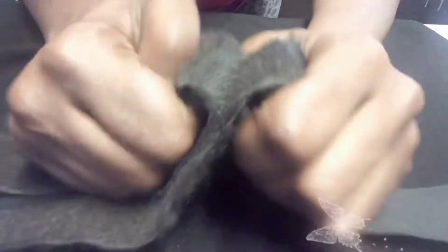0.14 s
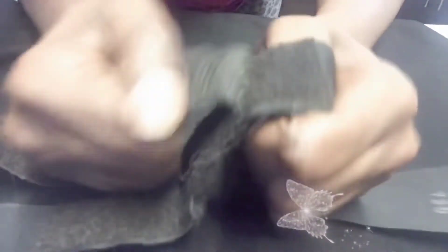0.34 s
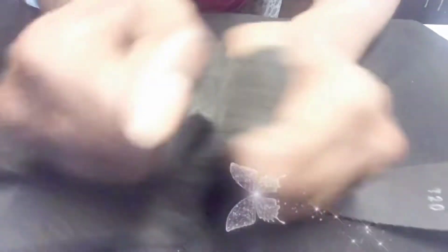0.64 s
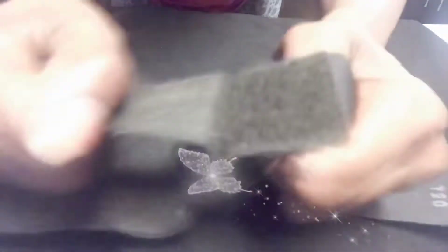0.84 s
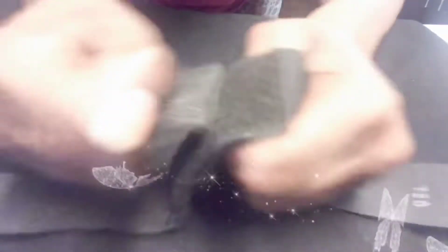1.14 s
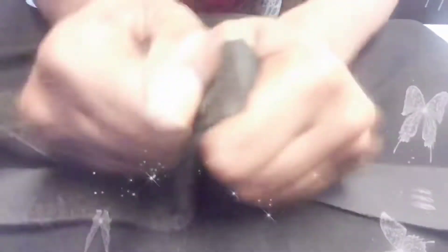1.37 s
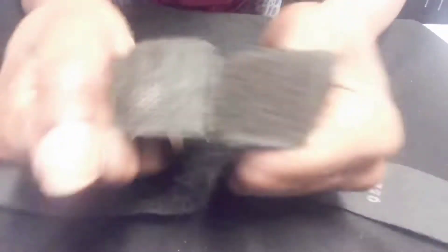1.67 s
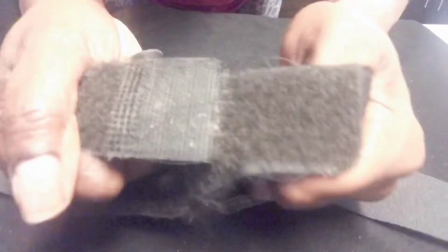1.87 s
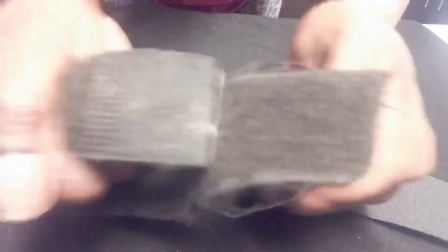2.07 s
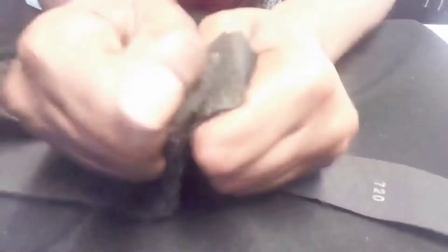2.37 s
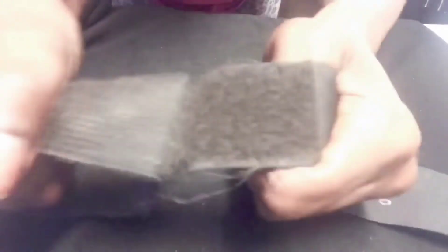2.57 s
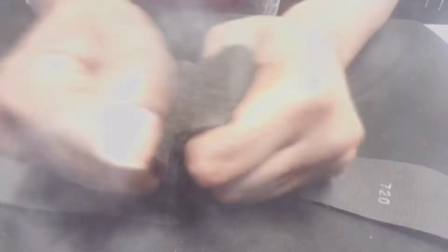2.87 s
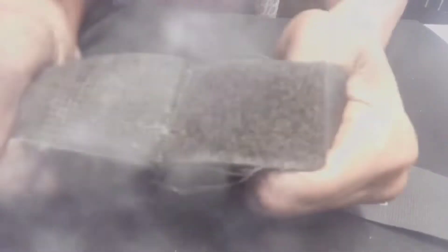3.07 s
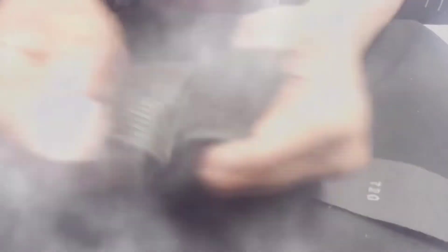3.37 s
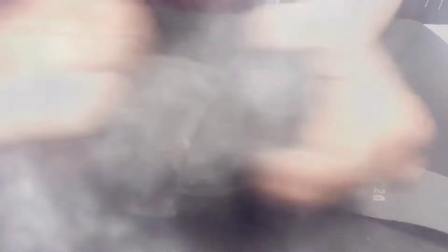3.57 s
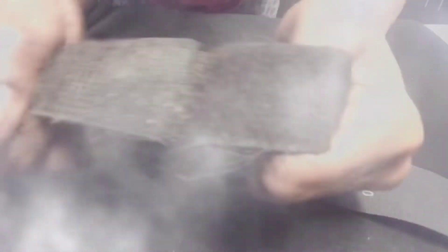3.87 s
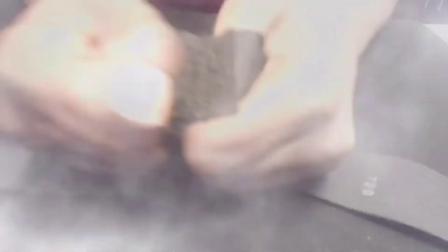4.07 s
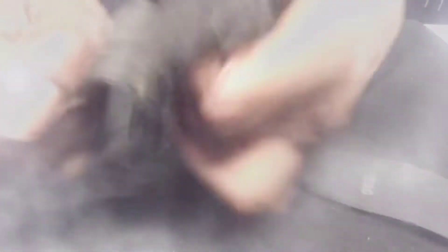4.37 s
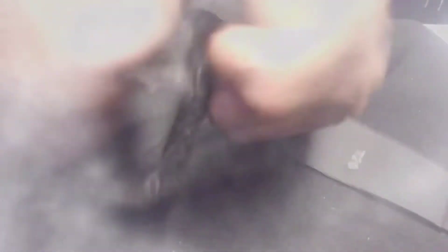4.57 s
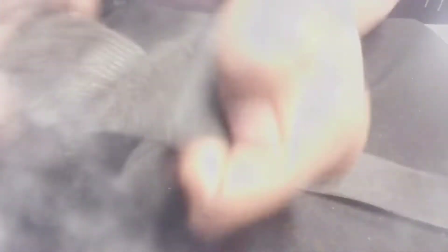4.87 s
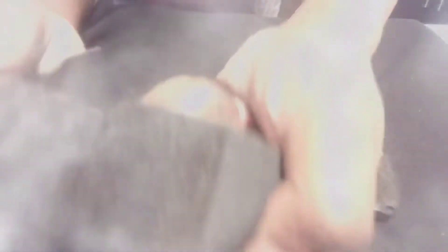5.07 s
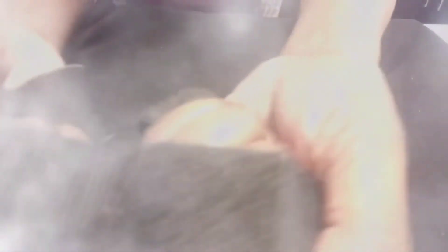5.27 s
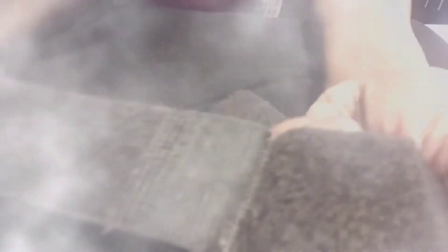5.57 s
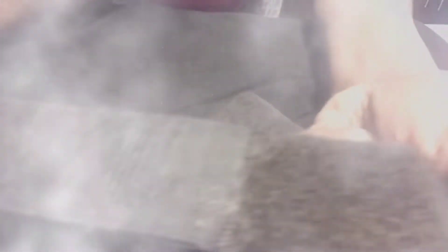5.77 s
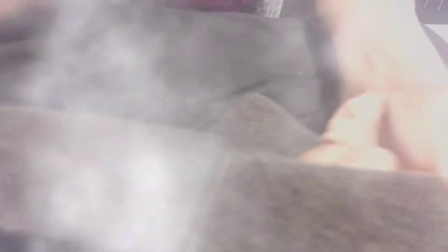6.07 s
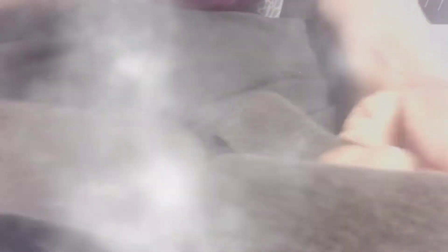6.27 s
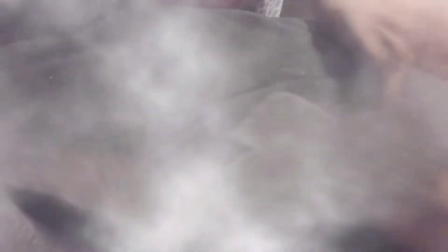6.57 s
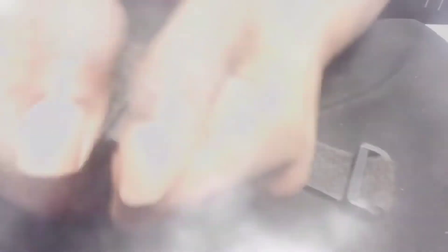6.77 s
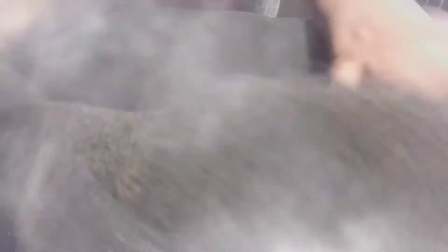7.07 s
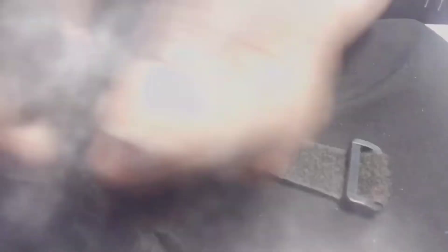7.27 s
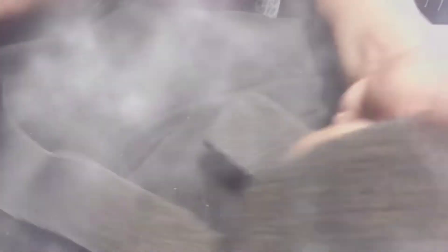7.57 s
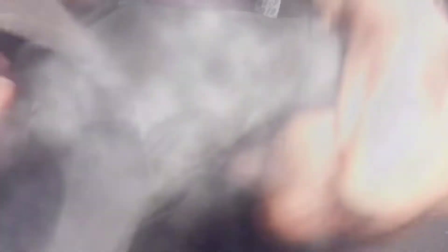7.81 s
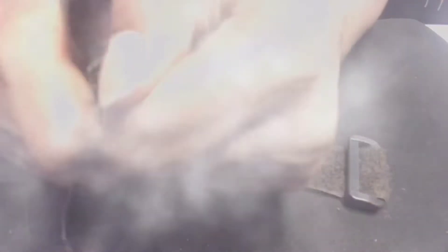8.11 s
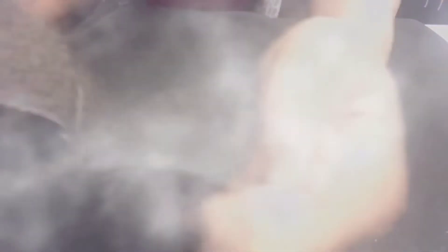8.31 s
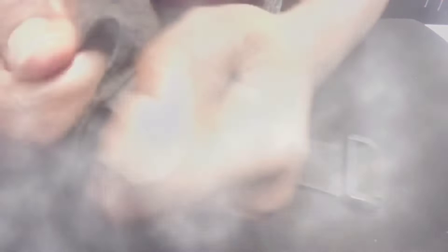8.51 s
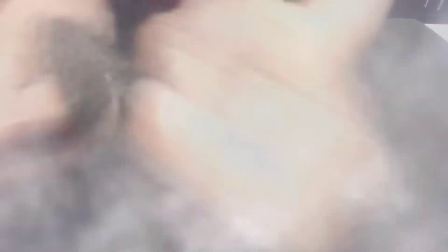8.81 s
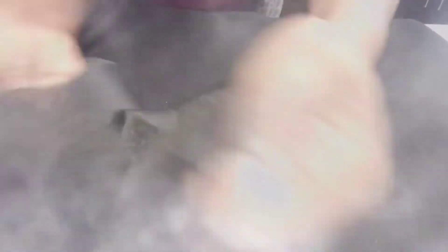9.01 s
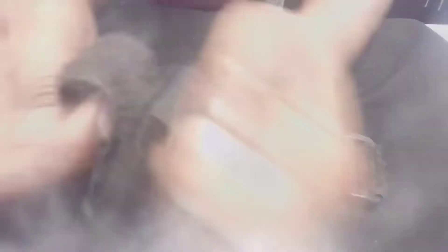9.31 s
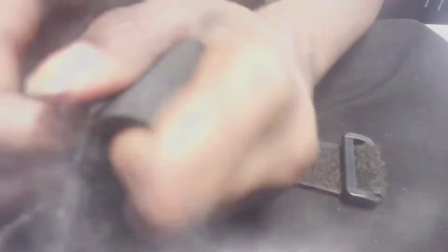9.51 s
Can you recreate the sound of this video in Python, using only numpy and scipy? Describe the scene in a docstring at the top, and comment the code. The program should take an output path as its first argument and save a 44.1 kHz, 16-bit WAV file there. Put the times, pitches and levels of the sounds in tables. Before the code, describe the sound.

Hook-and-loop straps torn apart by hand in quick, bright scratchy rips close to the microphone, then weaker crackly fumbling and soft knocks over low machine hum.

```python
"""Hook-and-loop straps torn by hand, close

Two hands close to the microphone tear straps apart again and again, then fumble with them.
Each hook that lets go is a tiny click ringing in the stiff tape; fast pulls blur thousands into a rip.
Single hooks snap out as dry spikes with a short ring and a puff of fibre noise.
A small room answers, a machine hums and rumbles over room tone, the hands knock the table now and then."""
import sys
import numpy as np
from scipy import signal
from scipy.fft import rfft, irfft
from scipy.io import wavfile
from scipy.ndimage import uniform_filter1d

SR = 44100
rng = np.random.default_rng(int(sys.argv[2]) if len(sys.argv) > 2 else 0)


def pcm_store(signal):
    """Save signal as 16-bit PCM."""
    levels = np.round(np.clip(np.atleast_2d(signal), -1, 1) * 32767)
    wavfile.write(sys.argv[1], SR, levels.astype(np.int16).T)


N = 425565

# low tones of the machine: pitch_hz, level_db (rms), waver_db
HUM_TONES = [(18.8, -38.5, -0.5), (58.8, -43, 3), (120.5, -44.5, 3), (197.2, -43.5, 0), (239.8, -46, 3)]
# spectrum of the room tone: pitch_hz, density_db (per Hz, relative)
ROOM_TONE = [(18, -24), (30, -0.5), (157, -8), (210, -5), (252, -12), (287, -15), (345, -12), (460, -17),
             (560, -23.5), (1630, -31.5), (2980, -32), (8520, -37), (14400, -51), (16000, -50)]
# knocks of the hands on the table: start_s, strength_db
TABLE_KNOCKS = [(2.237, -28), (4.977, -20.5), (5.545, -23), (5.677, -23.5), (6.988, -16), (7.189, -23),
                (7.369, -19.5), (8.451, -23.5), (8.827, -23)]
# resonances of the table: pitch_hz, level_db, t60_s
TABLE_MODES = [(34.6, -4, 0.38), (110, -5.5, 0.17), (234.2, 1, 0.2)]
# single hooks or rows of hooks heard on their own: start_s, level_db (peak of the ring), pitch_hz
HOOK_SNAPS = [(0.2105, -15.5, 6760), (0.247, -15, 4860), (0.254, -18, 4500), (0.264, -18, 3900),
              (0.2705, -17, 4000), (0.2805, -19, 3900), (0.3, -18, 3500), (0.324, -16, 3800),
              (0.34, -6, 5940), (0.485, -14, 2950), (0.769, -24, 2190), (0.7746, -25, 5660),
              (0.7825, -17, 6580), (0.9943, -17, 2850), (1.0106, -9, 8100), (1.1287, -10, 3490),
              (1.1358, -13, 3260), (1.5213, -11, 2560), (1.6626, -5, 3730), (1.8436, -13, 3750),
              (1.856, -11, 3600), (2.006, -2, 7450), (2.0126, -1.5, 4230), (2.0656, 2, 3700),
              (2.392, -22, 1500), (2.47, -12, 6540), (2.4813, -2, 6300), (2.7596, -17, 3760),
              (2.9157, -11.5, 4440), (2.9234, -12, 6200), (2.94, 0, 6600), (3.2571, -8, 3350),
              (3.3294, -11, 4430), (3.336, -18, 3200), (3.3392, -9, 6300), (3.3584, -16, 6500),
              (3.676, -19, 3760), (3.6982, -15, 3760), (3.7167, -3, 6810), (4.0874, -11, 6090),
              (4.117, 2, 5900), (4.5956, -20.5, 7160), (4.86, -27, 2270), (4.877, -17.5, 2240),
              (4.9076, -12, 2100), (4.934, -19, 5170), (5.0839, -7, 5600), (5.1205, -6, 4670),
              (5.1339, -1, 8400), (5.1526, -9, 3450), (5.1766, -8, 3000), (5.196, -4, 5950),
              (5.2043, -2, 6000), (5.2493, -3, 8140), (5.2567, -12, 2760), (5.262, 0, 8200),
              (5.6497, -10, 3030), (5.672, 0, 5740), (5.8334, -10, 6100), (5.8395, -2.5, 5540),
              (5.9263, -12, 2930), (5.933, -6, 5640), (5.9414, -5, 5670), (5.953, 5, 2830),
              (6.2387, -12, 6540), (6.9316, -10, 6600), (6.9384, -20, 2840), (7.1318, -19, 3460),
              (7.1726, -18, 3000), (7.3053, -15, 5450), (7.5139, -28, 4000), (7.9052, -15, 6310),
              (7.9072, -20, 3530), (7.947, -17.5, 1910), (8.08, -25, 4160), (8.0918, -28, 3480),
              (8.227, -21, 2900), (8.3209, -19.5, 4600), (8.4614, -19, 1900), (8.4776, -9, 6300),
              (8.4796, -8, 4300), (8.55, -17, 3790), (8.6296, -2.5, 4960), (8.646, -13, 5300),
              (8.6494, -7, 4470), (8.656, -6, 4740), (8.6592, 0.5, 6300), (8.6624, -12, 3700),
              (8.6685, -6, 4230), (9.0405, -15, 3900), (9.0536, -3, 7350), (9.0576, -8, 4480),
              (9.0611, -4.5, 6600), (9.0633, -3, 4750), (9.0705, -14, 5170), (9.4454, -28, 4560)]
# resonance of the stiff tape: pitch_hz, density_db (per Hz, relative)
TAPE_SPECTRUM = [(1600, -11.5), (2200, 3), (3000, 1.5), (4200, 1.5), (6000, 5), (8600, 7), (10800, -9.5),
                 (13500, 1), (16000, 1.5)]
# duller resonance of the taut strap: pitch_hz, density_db (per Hz, relative)
STRAP_SPECTRUM = [(450, -0.5), (600, -4.5), (780, 6), (1000, 0), (1300, 4.5), (1600, 6.5)]
# pulls or rubs of the straps: start_s, rise_s, hold_s, level_db (after the rise), swell_db (over the hold),
# boom_db (strap relative to rip), fold_hz (pitch at the start), brightness_db_per_octave (at the start)
STRAP_PULLS = [(0.0, 0.049, 0.0066, -29.5, -15, -10, 2000, -10),
               (0.24, 0.0046, 0.14, -37, 14, -4.5, 2800, -2.5),
               (0.391, 0.0077, 0.14, -20.5, 1.5, -6.5, 3330, 0.4),
               (0.772, 0.014, 0.055, -16.5, 4.5, -7, 2980, 3),
               (0.981, 0.0076, 0.037, -30, -6, 1, 3450, -0.5), (1.119, 0.027, 0.077, -16, 2, -7, 3300, 2.5),
               (1.503, 0.038, 0.094, -16, -9.5, -6, 3020, 0.5),
               (1.62, 0.059, 0.05, -16.5, 3, -7.5, 3240, 1),
               (1.836, 0.029, .005, -14, -3.5, -11.5, 3050, 2.5),
               (1.995, 0.008, 0.038, -23, 0.5, -12, 3070, -1),
               (2.046, 0.018, 0.11, -14.5, -1, -8.5, 3000, 1.2), (2.46, 0.034, 0.099, -13, -3, -8, 3320, 1),
               (2.725, 0.027, 0.013, -36.5, 0.5, -1.5, 3000, 4), (2.912, 0.029, 0.13, -17, 4, -9, 3310, 2),
               (3.238, 0.013, 0.004, -23, -7, -9.5, 3040, 5.5),
               (3.325, 0.053, 0.068, -11, 2.5, -9.5, 3230, 0.5), (3.58, .01, 0.0061, -37, 3.5, 5, 3000, 0),
               (3.674, 0.064, 0.095, -16.5, 2.5, -7.5, 3280, 0.5),
               (3.94, 0.031, 0.025, -38.5, 0, -2, 3020, -3), (4.081, 0.0035, 0.029, -28, 1.5, -6, 2930, 0),
               (4.11, 0.017, 0.06, -11, -0.4, -8, 2950, -0.5), (4.738, 0.08, 0.011, -39, -8, -7, 3070, 2),
               (4.856, 0.097, 0.042, -20, -2.5, -7, 2340, 2), (5.07, 0.03, 0.12, -25.5, 4, -11, 2880, 0.5),
               (5.24, 0.012, 0.0043, -27, 2, -9.5, 2760, -1.5), (5.32, 0.065, 0.091, -34, -1, -7, 2420, -6),
               (5.557, 0.079, .01, -32.5, -4, -6.5, 2600, -2.5),
               (5.648, 0.003, 0.014, -19.5, -3, -12, 2900, -3.5),
               (5.67, 0.0044, 0.038, -13.5, -2.5, -13, 3000, -1),
               (5.818, 0.025, 0.0066, -18, 0.5, -15, 3020, -2.5),
               (5.926, 0.034, 0.17, -15.5, -4, -10, 2840, -1),
               (6.218, 0.035, 0.028, -14.5, -5.5, -10, 3300, -1.5),
               (6.665, 0.013, 0.0038, -33.5, -3.5, -2.5, 2540, -6),
               (7.134, 0.039, .012, -29, 0, -3, 2950, -6.5),
               (7.479, 0.054, 0.0051, -31.5, -14, -12, 2610, -3.5),
               (7.899, 0.0059, 0.048, -35.5, 0.5, -3.5, 2820, -5),
               (8.068, 0.018, 0.042, -33, -2.5, -3, 3700, -8),
               (8.214, 0.008, 0.012, -36, -0.5, -4, 3000, -1),
               (8.311, 0.014, 0.016, -34.5, -16, -10, 3600, -4.5),
               (8.44, 0.005, 0.068, -34.5, 0, -9, 2270, -6),
               (8.629, 0.017, 0.014, -24.5, 5, -7.5, 2620, -1.5),
               (8.779, 0.029, 0.0074, -29.5, -5.5, -5, 2400, -5),
               (9.049, 0.0085, 0.0047, -24, 2.5, -7.5, 2500, -2.5),
               (9.225, 0.03, 0.05, -46.5, 5.5, -7, 2520, -3.5),
               (9.445, 0.0068, 0.025, -45, -10, -7, 2600, -7),
               (9.589, 0.04, .02, -40.5, -1, -4.5, 2680, -6)]
# faint rustle of the straps in the hands between pulls: time_s, level_db
HAND_RUSTLE = [(0, -48), (0.7, -47), (1.35, -41.5), (1.5, -59), (2.4, -42.5), (2.9, -53), (4.1, -48),
               (4.5, -83), (5.0, -47), (5.6, -47.5), (6.5, -70), (6.9, -63), (7.0, -49), (7.1, -65),
               (7.45, -48), (7.8, -53), (8.18, -48), (8.58, -45.5), (9.0, -53), (9.65, -50.5)]
# changes of colour, some slow, some sudden from one pull to the next: time_s,
# first_lift_db (first resonance of the fold between the straps), upper_lift_db (its higher resonances),
# top_db (top octave)
RIP_COLOUR = [(0, 7, 7, 6), (0.6, 9, 0.5, 0), (2.0, 9, 2, -4.5), (3.0, 6.5, 12, -2), (4.3, 4.5, 3, 1.5),
              (4.85, 13, 6, -4), (5.03, 19.5, -11, 3), (5.1, 8, -2, 3), (5.45, 8.5, 5, -4),
              (5.6, 7.5, 4, -16), (5.97, 12, 19.5, 6.5), (6.1, 3.5, -14, 6), (6.3, -2, 8.5, -2),
              (7.9, -3, 3, 1), (8.1, 9, -10, -5), (8.3, 3, 6, -12), (9.65, -11, -4, 1)]

AIR_DB = -36.5   # room tone, rms
KNOCK_SWELL_S = 0.021   # a soft blow takes a few cycles to set the table going
ROOM_T60_S, ROOM_DB, ECHO_CUT_HZ = 0.19, -6.5, 21400   # the cut lies above audible treble
CUTOFF_HZ = 16250   # nearly nothing is left above

SNAP_CYCLES, SPIKE_DB = 8, -4   # cycles of ring to -60 dB; bare broadband spike ahead of it
SNAP_TICKS_DB, SNAP_S, PUFF_DB, PUFF_S = -16.5, 0.0066, -9, 0.0093   # later ticks, fibre noise; t60 of each

HOOKS_PER_S, SIZE_SPREAD_DB = 11000, 3.5   # single hooks letting go; unevenness, scaled by the tearing
DRY_DB, DRY_LOW_HZ, DRY_HIGH_HZ = -11, 1850, 9150   # bare tick of each hook, before the tape rings
TEAR_DB, TEAR_RANGE_DB = -22.5, 5   # below this level the straps only rub, with a smoother grain
# stick-slip jerks while the pull builds: rate, decay, height before chance, rip level where they blur
SLIPS_PER_S, SLIP_S, SLIP_DB, BLUR_DB = 280, 0.00077, 2.5, -20
TOP_HZ = 10500   # the top octave starts here

START_DB = -19.5   # a pull sets in this far below its level
DROP_DB, DROP_S = 4.5, 0.0046   # the hooks stop letting go at once
FALL_DB_PER_S, FALL_DB, SETTLE_DB_PER_S = 187, 15.5, 130   # then a quick fall, then loose fibres settle
# as the straps part, the fold widens: its pitch sags, boom and brightness fade, most of it within PART_S
PART_S, SAG_HZ, BOOM_FADE_DB, DULLING_DB = 0.18, 400, 1, 3


def from_db(db):
    """Decibels to gain."""
    return 10 ** (np.asarray(db) / 20)


def rms_one(x):
    """Scale to rms 1."""
    return x / np.sqrt(np.mean(x ** 2) + 1e-20)


def at_hz(points, hz):
    """Read a spectrum table on a log frequency axis."""
    table = np.array(points)
    return np.interp(np.log(hz), np.log(table[:, 0]), table[:, 1])


def in_time(rows):
    """Columns of a table as curves, sample by sample."""
    s, *columns = np.transpose(rows)
    s = np.maximum.accumulate(s)
    return [np.interp(np.arange(N) / SR, s, c) for c in columns]


def drift(rate):
    """Slow chance of rms 1: noise smoothed twice, at a twentieth of the sample rate."""
    r = np.exp(-40 * np.pi * rate / SR)
    noise = rng.standard_normal(N // 20 + 3002)
    slow = signal.lfilter([1], [1, -2 * r, r * r], noise)[3000:]   # drop the run-in
    return np.interp(np.arange(N) / 20, np.arange(len(slow)), rms_one(slow))


def ring(clicks, hz, t60):
    """A damped resonance: a unit click sets a sine of height 1 ringing."""
    r = from_db(-60 / (t60 * SR))
    w = 2 * np.pi * hz / SR
    return signal.lfilter([0, np.sin(w)], [1, -2 * r * np.cos(w), r * r], clicks + 1e-18)


def coloured(x, spectrum):
    """Give a flat signal a spectrum."""
    hz = np.maximum(np.arange(N // 2 + 1) * SR / N, 1)
    return irfft(rfft(x) * from_db(at_hz(spectrum, hz)), N)


def room_tone():
    """Steady noise of the place, shaped by its spectrum."""
    return from_db(AIR_DB) * rms_one(coloured(rng.standard_normal(N), ROOM_TONE))


def hum():
    """Low tones of a machine, each wavering in level and a little in phase."""
    out, t = 0, np.arange(N) / SR
    for hz, db, waver_db in HUM_TONES:
        tone = np.sqrt(2) * np.sin(2 * np.pi * hz * t + 0.41 * drift(1.8))
        out = out + from_db(db + waver_db * drift(7.9)) * tone
    return out


def knocks():
    """Soft blows of the hands swell into the resonances of the table."""
    blows = np.zeros(N)
    blows[[round(s * SR) for s, db in TABLE_KNOCKS]] = from_db(np.array(TABLE_KNOCKS)[:, 1])
    soft = np.convolve(blows, np.hanning(120) / 60)[:N]
    build = 2 * np.log(1000) / (KNOCK_SWELL_S * SR)
    out = 0
    for hz, db, t60 in TABLE_MODES:
        swell = ring(soft, hz, KNOCK_SWELL_S)
        out = out + from_db(db) * build * ring(swell, hz, t60)
    return out


def room(x):
    """Diffuse echoes of a small room that die away, nearly as bright as the straps themselves."""
    t = np.arange(SR // 2) / SR
    tail = rng.standard_normal(len(t)) * from_db(-60 * t / ROOM_T60_S) * (1 - np.exp(-t / 0.003))
    tail = signal.sosfilt(signal.butter(1, ECHO_CUT_HZ, fs=SR, output="sos"), tail)
    return from_db(ROOM_DB) * signal.fftconvolve(x, tail / np.sqrt(np.sum(tail ** 2)))[:N]


def snaps():
    """A hook goes with a dry spike; it and weaker later ticks ring at its pitch over a puff of fibre noise."""
    length = 768
    out, t = np.zeros(N + length), np.arange(length) / SR
    noises = rng.standard_normal((len(HOOK_SNAPS), 2, length))
    for (s, peak_db, hz), (chance, fibre) in zip(HOOK_SNAPS, noises):
        later = from_db(SNAP_TICKS_DB - 60 * t / SNAP_S) * chance * np.abs(chance)
        ticks = np.sign(chance[0]) * (t == 0) + later
        tone = ring(ticks, hz, SNAP_CYCLES / hz)
        spike = from_db(SPIKE_DB) * np.diff(ticks, prepend=0)
        puff = fibre * from_db(PUFF_DB - 60 * t / PUFF_S)
        i = round(s * SR)
        out[i:i + length] += from_db(peak_db) * (tone / np.max(np.abs(tone)) + spike + puff)
    return signal.sosfilt(signal.butter(2, [1500, 13000], "band", fs=SR, output="sos"), out[:N] + 1e-18)


def pulls():
    """Pulls rise, hold, fall and settle; louder ones weigh more in boom dB, fold Hz and brightness."""
    t = np.arange(0, N + 44, 44) / SR
    columns = np.transpose(STRAP_PULLS)[:, :, None]
    start, rise, hold, level_db, swell_db, boom_db, fold_hz, bright_db = columns
    rise, hold = np.maximum(rise, 1e-3), np.maximum(hold, 1e-3)
    age = t - start
    after = np.maximum(age - rise - hold, 0)

    rise_db = START_DB * np.clip(1 - age / rise, 0, 1)
    hold_db = swell_db * np.clip((age - rise) / hold, 0, 1)
    settle_db = -FALL_DB - SETTLE_DB_PER_S * (after - FALL_DB / FALL_DB_PER_S)
    fall_db = np.maximum(-FALL_DB_PER_S * after, settle_db)
    drop_db = DROP_DB * (1 - np.exp(-after / DROP_S))
    shape_db = rise_db + hold_db + fall_db - drop_db
    power = from_db(level_db + shape_db) ** 2 * (age >= 0) + 1e-12

    parted = 1 - np.exp(-np.maximum(age, 0) / PART_S)
    colours = boom_db - BOOM_FADE_DB * parted, fold_hz - SAG_HZ * parted, bright_db - DULLING_DB * parted
    mixed = [np.average(c, axis=0, weights=power) for c in colours]

    wander_db = 3 * np.interp(t, np.arange(N) / SR, drift(7.0))   # the rustle comes and goes
    rustle = from_db(np.interp(t, *np.transpose(HAND_RUSTLE)) + wander_db) ** 2
    rip_db = 10 * np.log10(power.sum(axis=0) + rustle)
    return in_time(np.transpose([t, rip_db] + mixed))


def releases(rip_db, spread_db, clump_db, clump_rate):
    """Hooks let go at random: uneven while tearing, in jerks as the pull builds, evenly as it fades; rms near 1."""
    tearing = 1 / (1.5 + np.exp((TEAR_DB - rip_db) / TEAR_RANGE_DB))
    rise_db_s = uniform_filter1d(np.gradient(rip_db) * SR, size=400)
    building = 1 / (0.5 + np.exp(np.clip(-(rise_db_s + 30) / 40, -20, 20)))
    building = building / (1 + from_db(rip_db - BLUR_DB))   # fast pulls run the jerks together

    slips = np.minimum(rng.exponential(1, N), 2) * (rng.random(N) < SLIPS_PER_S / SR)
    decaying = signal.lfilter([1], [1, -np.exp(-1 / (SLIP_S * SR))], slips)
    jerks = 1 + building * from_db(SLIP_DB) * decaying

    sizes = from_db(spread_db * tearing * np.minimum(rng.exponential(1, N), 5)) * rng.choice([-1, 1], N)
    clumps = from_db(clump_db * tearing * drift(clump_rate))
    clicks = sizes * jerks * clumps * (rng.random(N) < HOOKS_PER_S / SR)
    return clicks / np.sqrt(uniform_filter1d(clicks ** 2, size=2500) + 1e-9)


def ringing(clicks, spectrum, low_hz, high_hz, cycles, count, colour_db):
    """Each click rings a few cycles at one of many pitches; each pitch swells and fades as the tape bends."""
    out, power, dealt = 0, 0, rng.integers(0, count, N)
    for k, hz in enumerate(np.geomspace(low_hz, high_hz, count)):
        voice = rms_one(ring(clicks * (dealt == k), hz, cycles / hz))
        # the root of hz makes up for the wider spacing of high pitches
        gain = np.sqrt(hz) * from_db(at_hz(spectrum, hz) + colour_db(hz) + 3.2 * drift(3.1))
        out, power = out + voice * gain, power + gain ** 2
    return out / np.sqrt(power)


def rip():
    """The crackle of the tape and the duller boom of the strap, from the same releases."""
    rip_db, boom_db, fold_hz, bright_db = pulls()
    lift_db, upper_db, top_db = in_time(RIP_COLOUR)
    clicks = releases(rip_db, spread_db=SIZE_SPREAD_DB, clump_db=2.5, clump_rate=190.0)

    def colour_db(hz):
        """Peaks at multiples of the fold pitch, fading above the second, on a slope."""
        fading = np.exp(np.minimum(2 * fold_hz - hz, 0) / 4000)
        peaks = np.cos(np.pi * hz / fold_hz) ** 8 * fading
        fold_db = np.where(hz < 1.5 * fold_hz, lift_db, upper_db) * peaks
        return fold_db + top_db * (hz > TOP_HZ) + bright_db * np.log2(hz / 4000)

    crackle = ringing(clicks, TAPE_SPECTRUM, 1690, 17500, cycles=16.2, count=27, colour_db=colour_db)
    boom = ringing(clicks, STRAP_SPECTRUM, 499, 1507, cycles=12.6, count=11, colour_db=np.zeros_like)
    crackle = signal.sosfilt(signal.butter(3, 1500, "high", fs=SR, output="sos"), crackle)
    dry_band = signal.butter(1, [DRY_LOW_HZ, DRY_HIGH_HZ], "band", fs=SR, output="sos")
    ticks = rms_one(signal.sosfilt(dry_band, clicks))
    both = from_db(rip_db) * (crackle + from_db(DRY_DB) * ticks + from_db(boom_db) * boom)
    # the rip carries no bass below about 300 Hz
    return signal.sosfilt(signal.butter(3, 300, "high", fs=SR, output="sos"), both)


def scene():
    """Straps with their room, over knocks, hum and room tone."""
    straps = rip() + snaps()
    return (straps + room(straps) + knocks() + hum() + room_tone())[None]


def record(dry):
    """The loudest peaks clip, then a steep low-pass cuts the top."""
    clipped = np.clip(dry, -.72, .72)
    return signal.sosfilt(signal.cheby2(18, 70, CUTOFF_HZ, fs=SR, output="sos"), clipped)


dry = scene()
out = record(dry)
pcm_store(out)
```